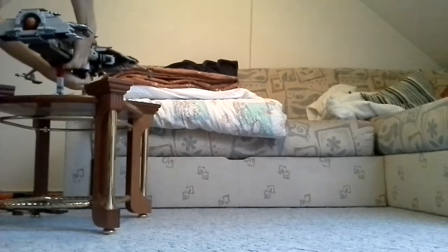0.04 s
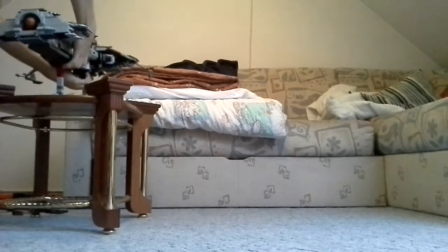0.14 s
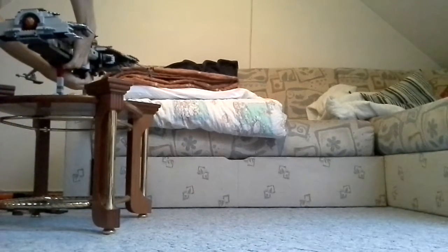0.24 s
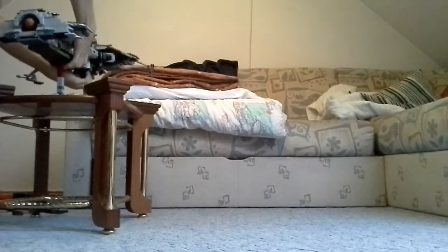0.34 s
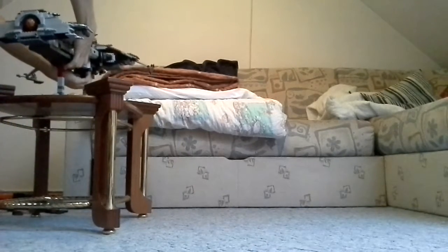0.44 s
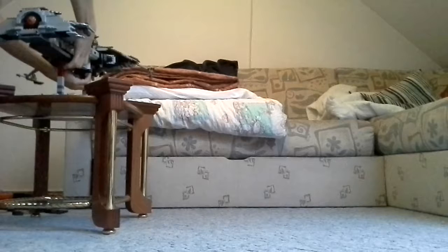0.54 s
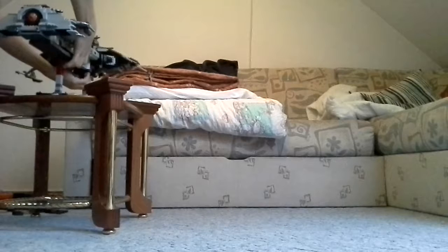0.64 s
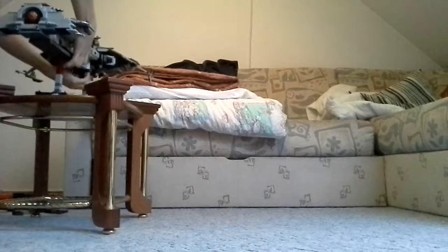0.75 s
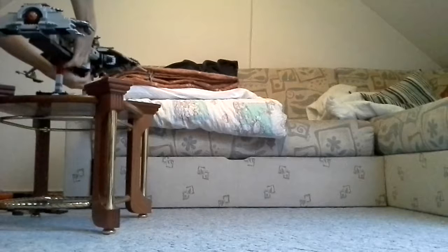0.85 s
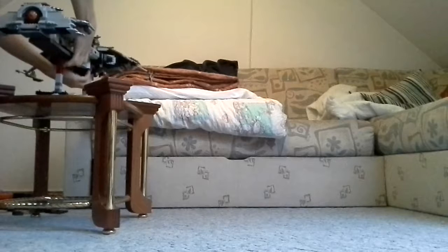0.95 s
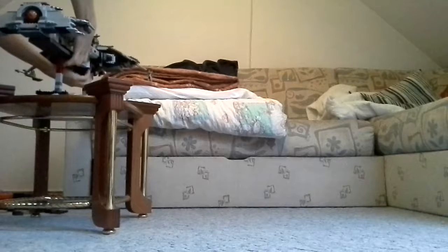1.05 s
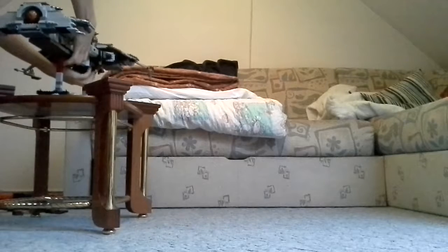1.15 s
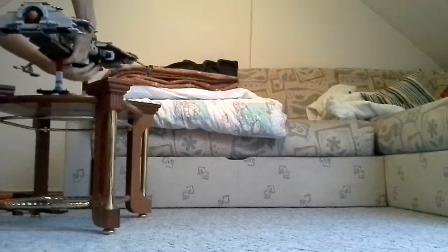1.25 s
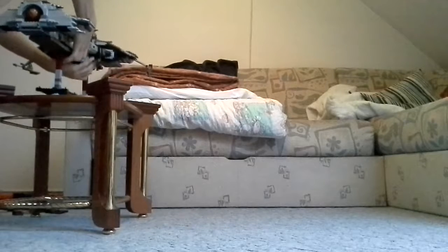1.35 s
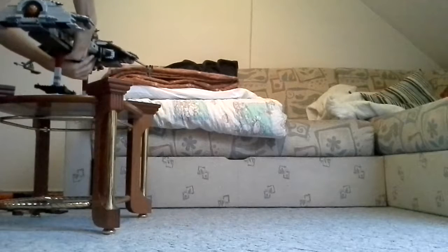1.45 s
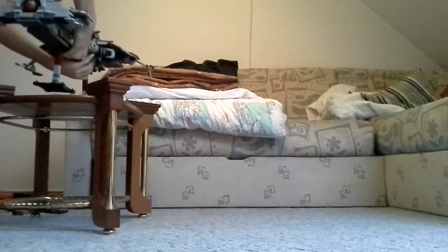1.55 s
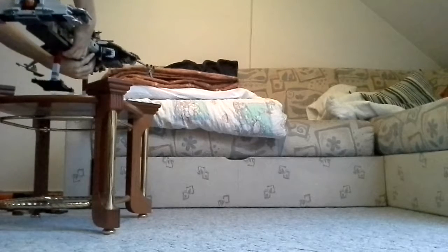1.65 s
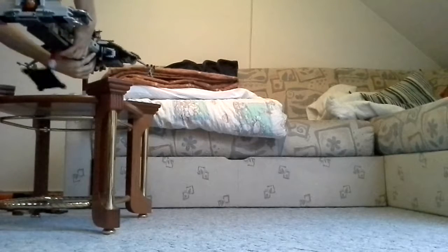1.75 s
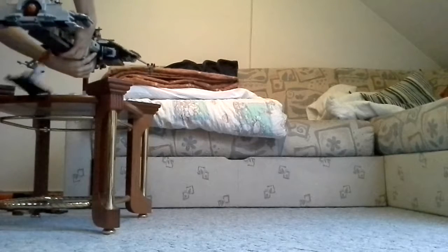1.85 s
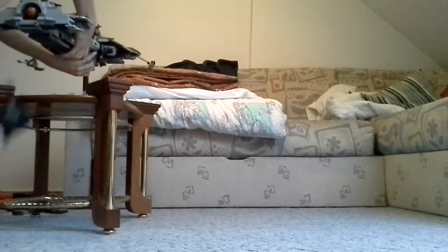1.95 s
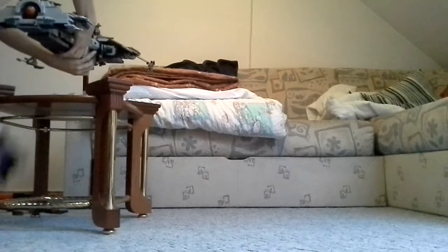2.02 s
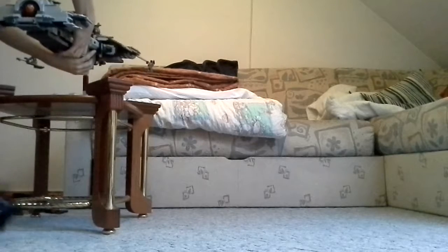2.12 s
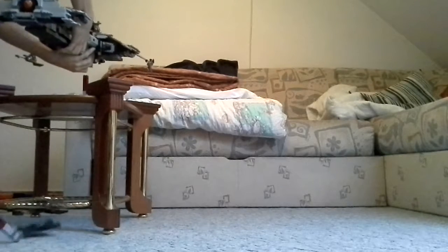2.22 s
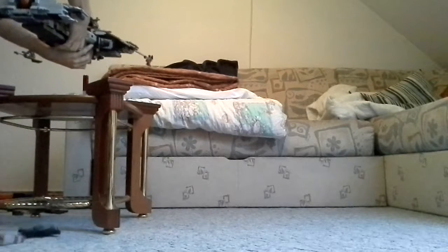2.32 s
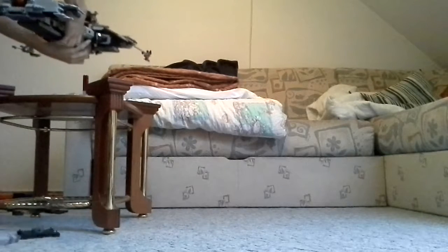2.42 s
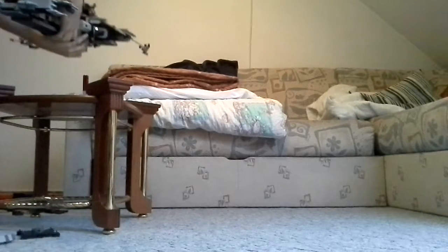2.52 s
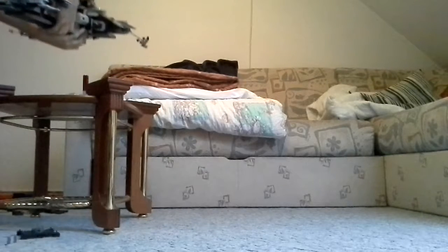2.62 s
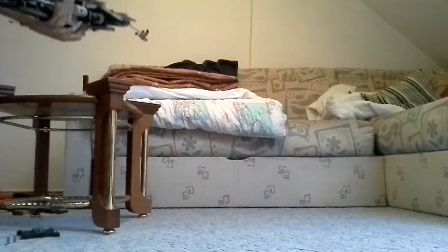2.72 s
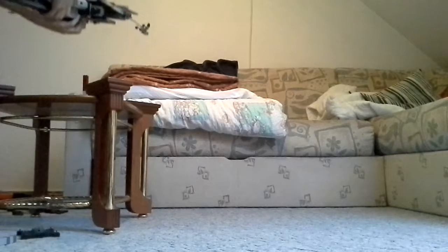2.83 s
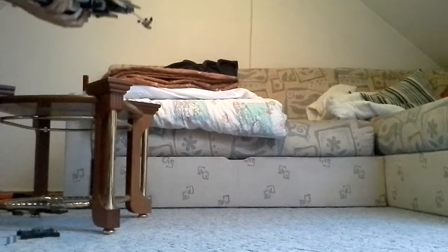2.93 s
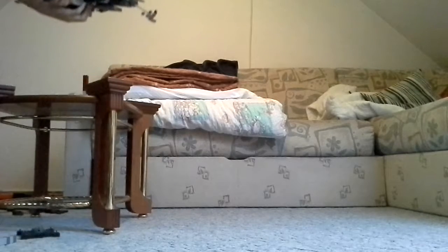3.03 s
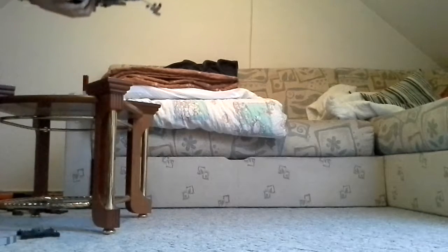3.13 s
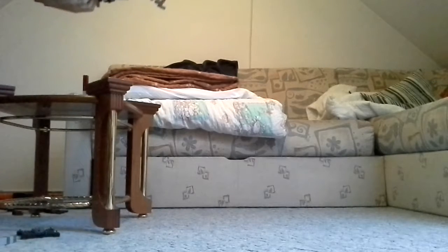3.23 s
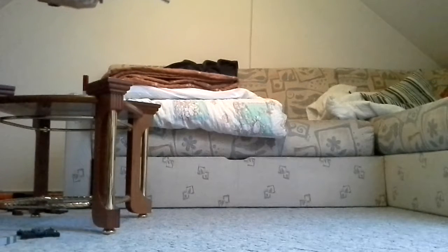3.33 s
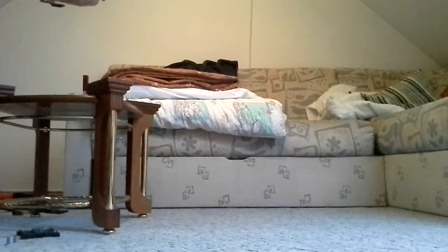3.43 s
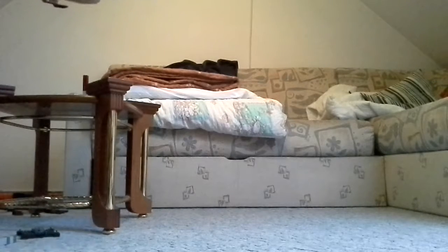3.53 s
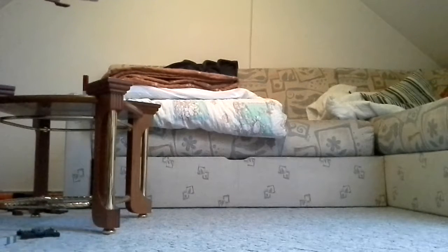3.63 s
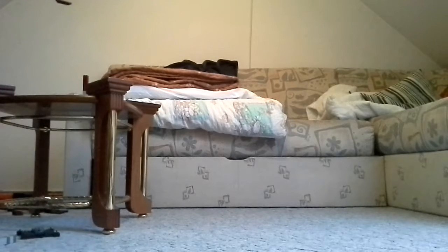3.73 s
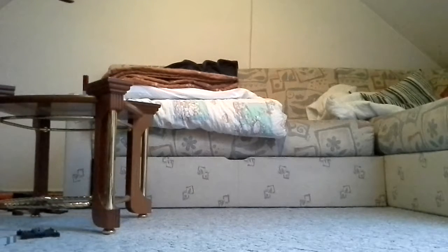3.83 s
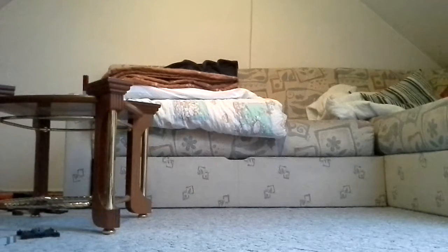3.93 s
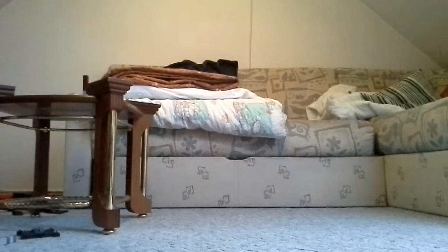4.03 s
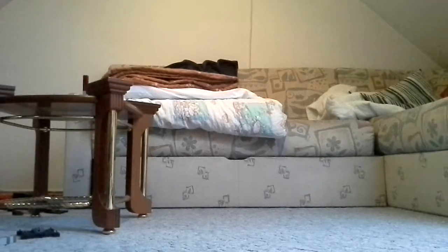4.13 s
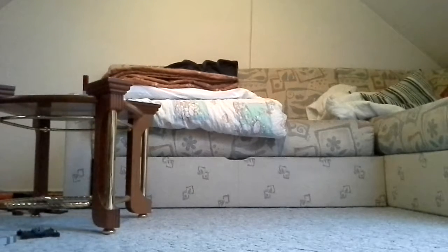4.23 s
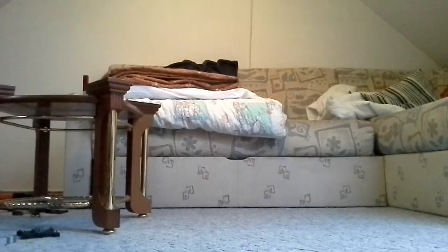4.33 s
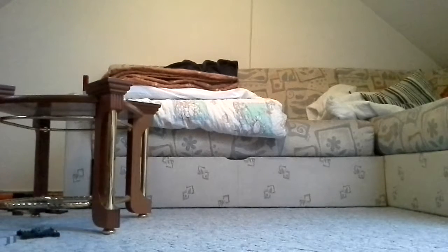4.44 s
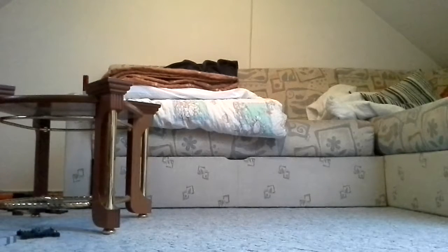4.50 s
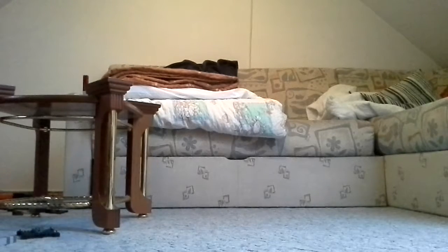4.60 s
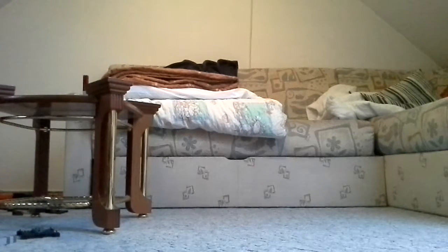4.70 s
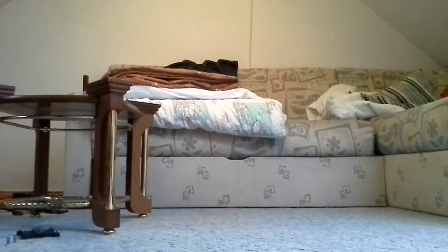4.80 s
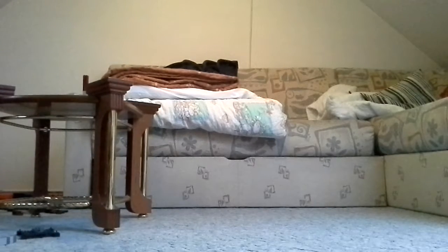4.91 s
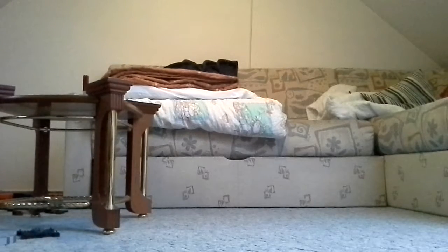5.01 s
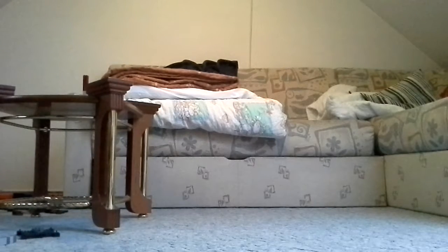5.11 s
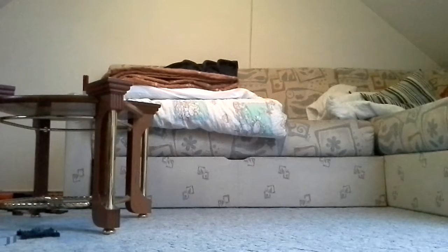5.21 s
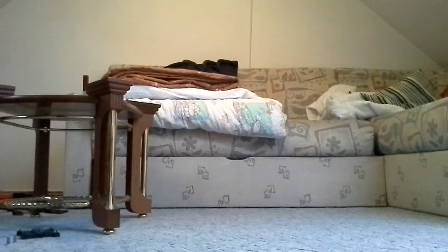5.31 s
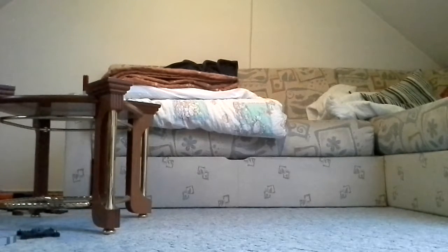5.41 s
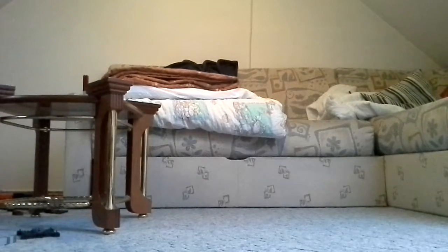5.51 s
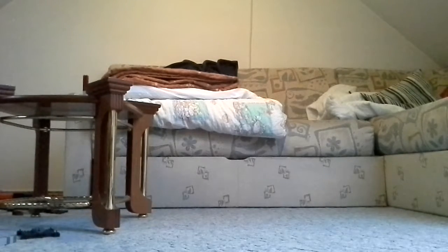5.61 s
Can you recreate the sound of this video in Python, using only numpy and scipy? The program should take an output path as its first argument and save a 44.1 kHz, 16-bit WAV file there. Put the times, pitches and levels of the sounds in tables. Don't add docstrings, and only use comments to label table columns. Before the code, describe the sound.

Low room rumble and thin hiss fade at first under a tiny rattle. At about 0.33 s a hard plastic brick model clacks on a glass table, bright and hollow, with another knock at 0.5 s and lighter bounces from 0.55 to 0.9 s, dying away. A faint touch comes near 1.1 s, and the background sinks. Small clicks at 1.7 s lead to two loud, sharp cracks at 1.85 and 1.89 s as the stand tears loose. At 2.14 s it lands on carpet with a full, hollow thud and bright clattering bricks, hits again at 2.25 s and gives a last soft bounce at 2.41 s. From 2.7 to 5.3 s only quiet creaks, ticks and dry clicks of the carried model remain, clearer around 3.5 and 4.4 s, getting weaker. The small room adds a short echo; gated hiss swells after sounds and finally sinks.

```python
import sys
import numpy as np
from scipy import signal
from scipy.fft import rfft, irfft, next_fast_len
from scipy.io import wavfile
from scipy.ndimage import uniform_filter1d, minimum_filter1d

SR = 44100
rng = np.random.default_rng(int(sys.argv[2]) if len(sys.argv) > 2 else 0)


def generate_wav(sig):
    pcm = np.round(np.clip(np.atleast_2d(sig).T, -1, 1) * 32767).astype(np.int16)
    wavfile.write(sys.argv[1], SR, pcm)


def ratio_of_db(decibels):
    return 10 ** (np.asarray(decibels, float) / 20)


N = 249606
SPAN = 16384


def rms_one(x):
    return x / np.sqrt(np.mean(x ** 2) + 1e-20)


def start_level(ring):
    return np.sqrt(np.mean(ring[:SR // 50] ** 2))


def at_hz(points, hz):
    p = np.array(points)
    return np.interp(np.log(np.maximum(hz, 1)), np.log(p[:, 0]), p[:, 1])


def add(out, piece, s):
    i = round(s * SR)
    out[i:i + len(piece)] += piece[:N - i]


def coloured(spectrum):
    size = next_fast_len(N)
    hz = np.arange(size // 2 + 1) * SR / size
    white = rfft(rng.standard_normal(size))
    return rms_one(irfft(white * ratio_of_db(at_hz(spectrum, hz)), size)[:N])


# [t/s, level/dB]
GATE_OPENING = [(0.0, -6.5), (0.14, -12), (0.31, -20), (0.4, -1.5), (0.63, -1.1), (0.93, -5), (1.53, -16),
                (1.75, -15), (1.85, -0.5), (2.54, -3.5), (2.87, -3), (3.301, -9), (3.7, -4), (4.15, -9.5),
                (4.35, -3.5), (4.98, -10.5), (5.491, -19.5), (5.66, -22)]
# [f/Hz, level/dB per Hz]
RUMBLE_COLOUR = [(47, -38), (80, -12), (102, -0.5), (134, -1.5), (195, -1.5), (353, -6), (390, -5.5),
                 (2500, -24.5), (3250, -46), (5500, -120)]
# [f/Hz, level/dB per Hz]
HISS_COLOUR = [(410, -33), (700, -5), (1290, -4), (2190, -5.5), (2620, -8), (4570, -5), (5670, -8.5),
               (14000, -8), (14500, -14)]
# [f/Hz, level/dB per Hz]
DEEP_COLOUR = [(12, -46), (20, -18.5), (22, -19.5), (64, -5), (90, 1), (120, -28), (200, -120)]


def background():
    open_db = np.interp(np.arange(N) / SR, *np.transpose(GATE_OPENING))
    rumble = ratio_of_db(-52 + 0.91 * open_db) * coloured(RUMBLE_COLOUR)
    hiss = ratio_of_db(-52.5 + open_db) * coloured(HISS_COLOUR)
    return rumble + hiss + ratio_of_db(-70.5) * coloured(DEEP_COLOUR)


def voiced(rows, thud_db, snap_db):
    knocks = []
    for s, body_db, bright_db, t60 in rows:
        snap = body_db + max(bright_db, 0) + snap_db
        knocks.append((s, snap, body_db + thud_db, body_db, body_db + bright_db, t60))
    return knocks


# [t/s, body level/dB, brick click level/dB above body, rattle t60/s]
TABLE_KNOCKS = [(0.001, -49, 0.5, 0.42), (0.33, -15.5, -3, 0.063), (0.337, -17.5, 4, 0.26),
                (0.353, -21, -22, .079), (0.476, -31.5, -5, 0.6), (0.503, -21.5, -15, 0.14),
                (0.512, -37, 3.5, 0.31), (0.556, -27, -2, 0.25), (0.639, -32, -9.5, 0.3),
                (0.723, -38.5, -9, 0.31), (0.797, -44.5, -10, 0.38), (0.899, -55, -1, 0.1),
                (1.082, -47.5, -13, 0.16)]


def knocks_on_glass():
    return voiced(TABLE_KNOCKS, thud_db=-9.5, snap_db=6.4)


def contacts(t60):
    touches_per_s, spread_db = 2500, 5
    chance = rng.random(SPAN)
    size = rng.exponential(1, SPAN)
    sign = rng.choice([-1, 1], SPAN)
    chance[0] = 0
    t = np.arange(SPAN) / SR
    dying = ratio_of_db(spread_db * np.minimum(size, 3) - 60 * t / max(t60, .01)) * (t < .35)
    return (chance < touches_per_s / SR) * sign * dying


# [f/Hz, level/dB per Hz]
BRICK_COLOUR = [(90, -39.5), (130, -14.5), (300, -1), (700, -8), (1100, -8), (1700, -8.5), (2200, -11),
                (2700, -17.5), (3300, -15.5), (4000, -9.5), (4700, -8.5), (5600, -16), (7500, -25.5),
                (14500, -55)]


def mode_bank(low_hz, high_hz, cycles, places):
    hz = (low_hz * (high_hz / low_hz) ** places)[:, None]
    r = ratio_of_db(-60 * hz / (cycles * SR))
    w = 2 * np.pi * hz / SR
    z = np.exp(-2j * np.pi * np.arange(SPAN // 2 + 1) / SPAN)
    sign = (-1.) ** np.arange(len(hz))[:, None]
    gain = ratio_of_db(at_hz(BRICK_COLOUR, hz)) * (1 - r) * sign
    return gain * (1 - z * z) / (1 - 2 * r * np.cos(w) * z + r * r * z * z)


def rattling_bricks(rows, snap_trim_db):
    thud, body, brick = (190, 600, 18, 0.089), (603, 2400, 21, 0.036), (2500, 14500, 24, 0.039)
    families = thud, body, brick
    modes, handfuls = 28, 4
    mode_spread_db, snap_t60_s = 3, .006
    out, t = np.zeros(N), np.arange(SPAN) / SR
    places = (np.arange(modes) + rng.random((3, modes))) / modes
    banks = [mode_bank(*family[:3], p) for family, p in zip(families, places)]
    for s, snap_db, *family_db, t60 in rows:
        dealt = rng.integers(0, handfuls, SPAN) == np.arange(handfuls)[:, None]
        strength = ratio_of_db(mode_spread_db * rng.standard_normal((3, handfuls, modes)))
        touches = rfft(contacts(t60) * dealt)
        snap = 0
        for bank, weights, db, family in zip(banks, strength, family_db, families):
            response = weights @ bank
            ring = irfft(np.sum(touches * response, axis=0), SPAN)
            add(out, ratio_of_db(db + family[3]) * ring / start_level(ring), s)
            snap = snap + ratio_of_db(db) * rms_one(irfft(response[0], SPAN))
        snap = snap * ratio_of_db(-60 * t / snap_t60_s)
        add(out, ratio_of_db(snap_db + snap_trim_db) * snap / np.max(np.abs(snap)), s)
    return out


# [f/Hz, t60/s]
ROOM_DECAY = [(150, 0.57), (600, 0.34), (2000, 0.29), (5000, 0.28), (12000, .22)]


def room(x):
    first_echo_s = 0.0013
    t, tail = np.arange(SR // 2) / SR, 0
    for low in 60 * 2. ** np.arange(8):
        octave = signal.butter(2, [low, 2 * low], "band", fs=SR, output="sos")
        band = signal.sosfilt(octave, rng.standard_normal(len(t)))
        tail = tail + band * ratio_of_db(-60 * t / at_hz(ROOM_DECAY, low * np.sqrt(2)))
    tail = tail * np.clip(t / first_echo_s - 1, 0, 1)
    return signal.fftconvolve(x, tail / np.sqrt(np.sum(tail ** 2)))[:N]


# [t/s, level/dB]
STUD_TUBES = (4700, 750, .26), [(.33, -14), (.502, -32), (1.777, -39.5), (2.207, -33), (2.408, -41),
              (4.366, -41), (4.954, -54.5), (5.307, -66)]
# [t/s, level/dB]
WIDE_TUBES = (3940, 780, 0.084), [(.642, -40), (.727, -45.5), (1.27, -63)]
# [t/s, level/dB]
BRICK_WALLS = (3050, 1100, 0.39), [(.332, -24), (1.847, -20)]
# [t/s, level/dB]
THIN_BEAMS = (2240, 300, .14), [(1.886, -19.5), (2.143, -34), (3.488, -51), (4.953, -52)]
# [t/s, level/dB]
SMALL_BOXES = (1420, 330, 0.099), [(.36, -24.5), (1.776, -37), (1.885, -17), (5.089, -60.5), (5.16, -66)]
# [t/s, level/dB]
LARGE_BOXES = (930, 450, 0.09), [(.288, -55), (.318, -38), (.331, -19.5), (.503, -26.5), (.558, -30),
               (1.847, -29.5), (2.246, -20.5), (2.41, -28.5)]
# [t/s, level/dB]
HULL = (310, 120, 0.37), [(.331, -39.5), (2.251, -31), (1.93, -38)]
# [t/s, level/dB]
FLOORBOARDS = (160, 120, 0.24), [(2.144, -28), (2.26, -34.5), (1.887, -36), (2.412, -38.5)]
# [t/s, level/dB]
TINY_TILES = (6650, 660, .12), [(1.847, -22.5)]
# [t/s, level/dB]
DUST = (9050, 4900, .24), [(.288, -60), (4.364, -47.5), (4.953, -55.5)]
# [t/s, level/dB]
BASE_PLATE = (540, 380, .2), [(1.847, -34), (1.888, -22), (1.96, -34.5), (2.41, -33), (4.18, -57),
              (.52, -39), (5.29, -60), (5.35, -62.5)]
# [t/s, level/dB]
AXLE_HIGH = (4530, 120, 0.4), [(2.21, -32.5), (2.36, -46.5)]
# [t/s, level/dB]
AXLE_LOW = (2230, 98, 0.59), [(2.2, -40.5), (2.36, -53.5)]
# [t/s, level/dB]
LOOSE_GRIT = (3200, 5000, .4), [(.288, -45.5), (1.695, -55), (1.765, -44.5), (3.488, -44.5), (4.954, -52),
              (5.02, -57.5)]
# [t/s, level/dB]
SOFT_PANEL = (260, 260, 0.22), [(2.411, -35), (1.89, -35.5), (5.02, -62)]
# [t/s, level/dB]
SHORT_TUBES = (4860, 350, .2), [(3.488, -38), (3.725, -53), (4.125, -49.5), (4.235, -47.5)]
# [t/s, level/dB]
HINGE = (1890, 470, 0.19), [(3.299, -49.5), (3.62, -51)]


def hollow_parts():
    out = np.zeros(N)
    parts = STUD_TUBES, WIDE_TUBES, BRICK_WALLS, THIN_BEAMS, SMALL_BOXES, LARGE_BOXES, HULL, FLOORBOARDS
    parts += TINY_TILES, DUST, BASE_PLATE, AXLE_HIGH, AXLE_LOW, LOOSE_GRIT
    parts += SOFT_PANEL, SHORT_TUBES, HINGE
    for (hz, width_hz, t60), strikes in parts:
        r = np.exp(-np.pi * width_hz / SR)
        poles = [1, -2 * r * np.cos(2 * np.pi * hz / SR), r * r]
        for s, db in strikes:
            ring = contacts(t60) + 1e-18
            for _ in range(2):
                ring = signal.lfilter([1, 0, -1], poles, ring)
            add(out, ratio_of_db(db) * ring / start_level(ring), s)
    return out


# [t/s, f/Hz, level/dB, swell/s, t60/s]
FIRST_BLOWS = [(1.8478, 4600, -4, .0004, .014), (1.8478, 1200, -11, .0004, .02),
               (2.1415, 640, -3, .001, .025), (1.886, 1700, -10, .0005, .02), (2.143, 125, -15, .004, .12),
               (2.246, 950, -14, .0005, .025), (2.41, 700, -20, .0005, .03), (2.41, 180, -32, .003, .12),
               (.503, 1100, -18, .0005, .025), (.331, 110, -38, .004, .15)]
# [t/s, level/dB]
BOUNCES = [
    (.645, -35.5),
    (0.729, -40.5),
    (0.798, -47),
    (0.869, -49.5),
]
# [f/Hz, level/dB, swell/s, t60/s]
LOOSE_PART = [(420, -2.5, .006, .18), (790, -5, .006, .14), (1180, .1, .006, .16), (1680, -2.5, .006, .14)]
# [t/s, f/Hz, level/dB, swell/s, t60/s]
CLEAR_PLATES = [
    (1.886, 1551, -15.5, 0.0035, 0.24),
    (2.142, 475.3, 1, 0.026, 0.23),
    (2.142, 226.3, -18, 0.0068, 0.28),
    (2.142, 364, -13.5, 0.027, 0.2),
    (2.142, 733, -12, 0.0015, 0.088),
    (2.218, 1286, -13.5, 0.0046, 0.14),
    (4.125, 2270, -48, 0.002, .12),
]


def clear_plates():
    out, t = np.zeros(N), np.arange(SPAN) / SR
    bouncing = []
    for s, db in BOUNCES:
        for hz, mode_db, swell, t60 in LOOSE_PART:
            bouncing.append((s, hz, db + mode_db, swell, t60))
    for s, hz, db, swell, t60 in CLEAR_PLATES + FIRST_BLOWS + bouncing:
        envelope = (1 - np.exp(-t / max(swell, .0002))) * ratio_of_db(db - 60 * t / t60)
        add(out, envelope * np.sin(2 * np.pi * hz * t), s)
    return out


# [t/s, body level/dB, brick click level/dB above body, rattle t60/s]
BREAKING = [
    (1.694, -59, 11, 0.37),
    (1.763, -37, -1, 0.43),
    (1.778, -31.5, -5, 0.23),
    (1.847, -14, 4.5, 0.16),
    (1.884, -13, 0.5, 0.21),
    (1.896, -14, -6, 0.053),
    (1.945, -35.5, 2.5, .084),
]


def stand_tears_loose():
    return voiced(BREAKING, thud_db=-17, snap_db=10.5)


# [t/s, body level/dB, brick click level/dB above body, rattle t60/s]
LANDING = [
    (2.141, -11.5, -13.5, 0.079),
    (2.145, -19.5, 4.5, .08),
    (2.155, -21, 6, 0.23),
    (2.208, -26, 4.5, 0.32),
    (2.245, -25.5, -0.7, 0.34),
    (2.399, -50, 5, 0.16),
    (2.41, -34, -12, .1),
]


def stand_lands_on_carpet():
    return voiced(LANDING, thud_db=5.5, snap_db=4)


# [t/s, body level/dB, brick click level/dB above body, rattle t60/s]
CREAKS = [(2.66, -50.5, 1.5, 0.25), (2.709, -46.5, -1.1, 0.14), (2.869, -50, 2, 0.34),
          (2.93, -48.5, 5, 0.27), (3.278, -49.5, -6, .3), (3.311, -45, -2.5, 0.33), (3.441, -45, -9, 0.18),
          (3.488, -47.5, 8.5, .2), (3.619, -41, -1.5, .17), (3.72, -52.5, 7, 0.18), (3.822, -55.5, 9, 0.18),
          (3.839, -48.5, 4, 0.21), (4.125, -56, 7.5, 0.14), (4.179, -51.5, 3.5, 0.31),
          (4.233, -53, 10, 0.33), (4.364, -44.5, 10.5, 0.23), (4.883, -53.5, 1.5, 0.27),
          (4.954, -51, 6.5, 0.21), (5.009, -56, 0, 0.28), (5.049, -66, 1, .12), (5.09, -61, -7, .11),
          (5.159, -68, -13, .1), (5.308, -59, 4, .12)]


def creaks_in_hands():
    return voiced(CREAKS, thud_db=-27, snap_db=20)


def scene():
    crashes = knocks_on_glass() + stand_tears_loose() + stand_lands_on_carpet()
    hits = rattling_bricks(crashes, snap_trim_db=-2.5)
    hits = hits + rattling_bricks(creaks_in_hands(), snap_trim_db=-9)
    hits = hits + ratio_of_db(3.5) * hollow_parts()
    hits = ratio_of_db(-8.5) * (hits + ratio_of_db(-8.5) * room(hits)) + clear_plates()
    low_cut = signal.butter(3, 90, "high", fs=SR, output="sos")
    hits = signal.sosfilt(low_cut, hits)
    return (hits + background())[None]


def thin_treble(x):
    corner_hz, limit_at_corner_db = 8000, -47
    spread_db, db_per_octave = 2.5, 5
    hz, _, cells = signal.stft(x, SR, nperseg=2048)
    power = np.abs(cells) ** 2
    loud = minimum_filter1d(power[hz > 1000].sum(axis=0), size=2)
    luck = rng.standard_normal((len(hz) // 12 + 1, len(loud)))
    luck = np.repeat(luck, 12, axis=0)[:len(hz)]
    octaves = np.log2(np.maximum(hz, 1) / corner_hz)[:, None]
    limit_db = limit_at_corner_db + spread_db * luck + db_per_octave * octaves
    faint = uniform_filter1d(power, size=12, axis=0) < ratio_of_db(2 * limit_db) * loud
    dropped = faint & (octaves > 0)
    return signal.istft(cells * ~dropped, SR, nperseg=2048)[1][:N]


def low_pass(x):
    return signal.sosfilt(signal.butter(12, 15170, fs=SR, output="sos"), x)


def record(dry):
    ceiling = 2.2
    rounded = ceiling * np.tanh(dry[0] / ceiling)
    top_cut = signal.ellip(10, .2, 70, 14700, fs=SR, output="sos")
    mix = signal.sosfiltfilt(top_cut, thin_treble(rounded))
    return low_pass(mix[None])


dry = scene()
out = record(dry)
generate_wav(out)
```